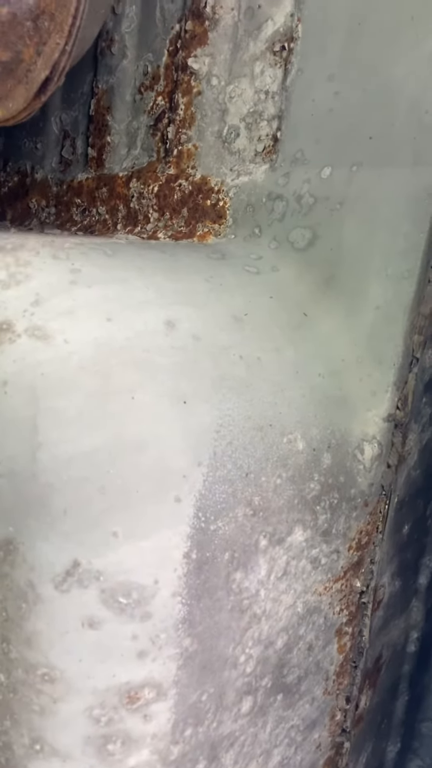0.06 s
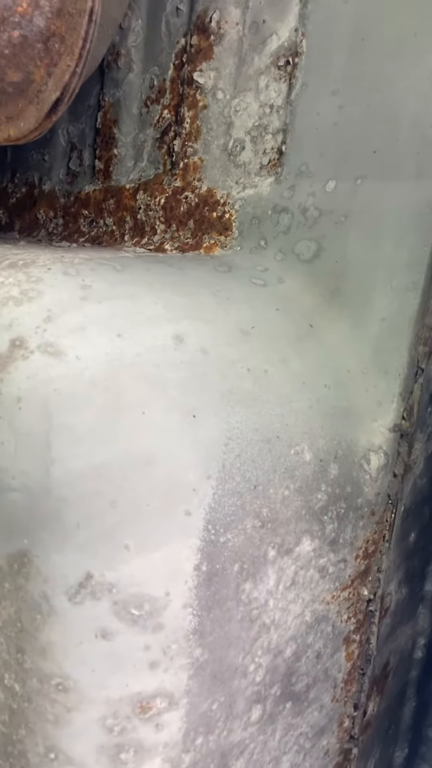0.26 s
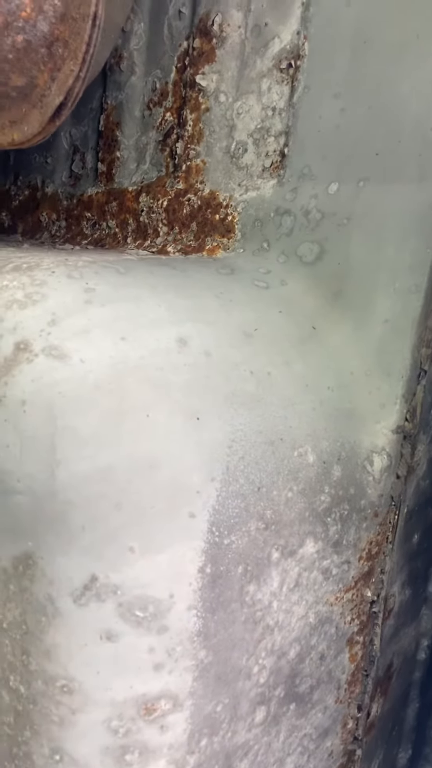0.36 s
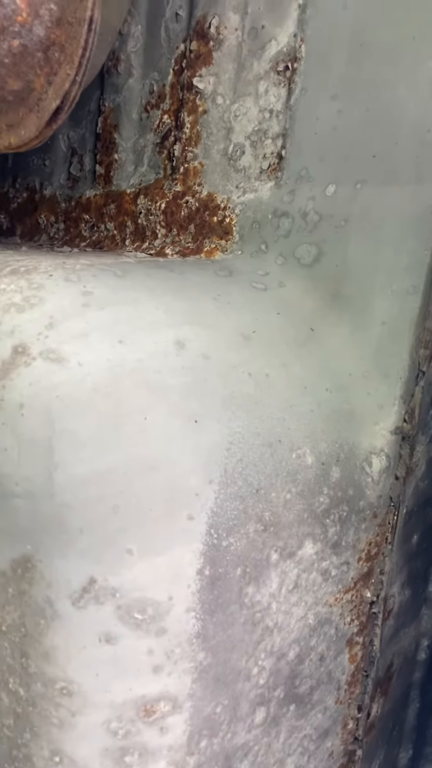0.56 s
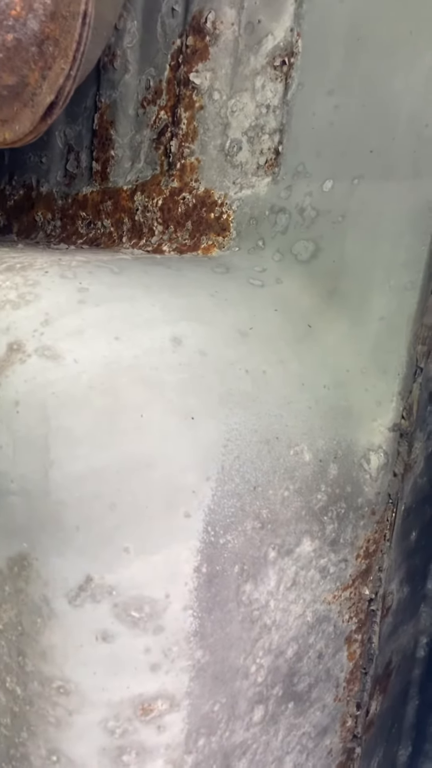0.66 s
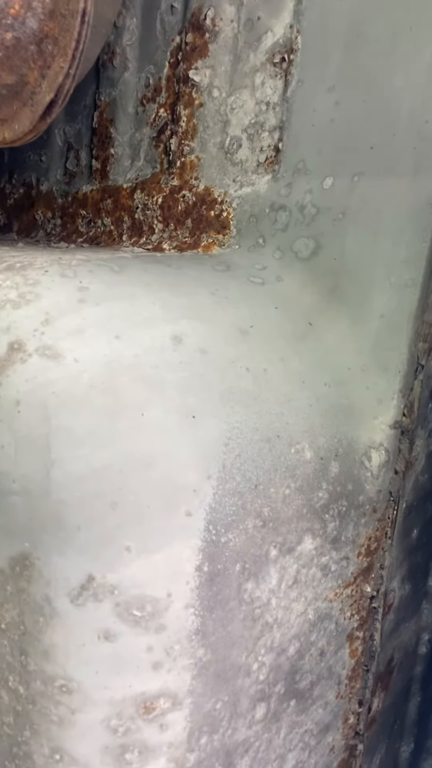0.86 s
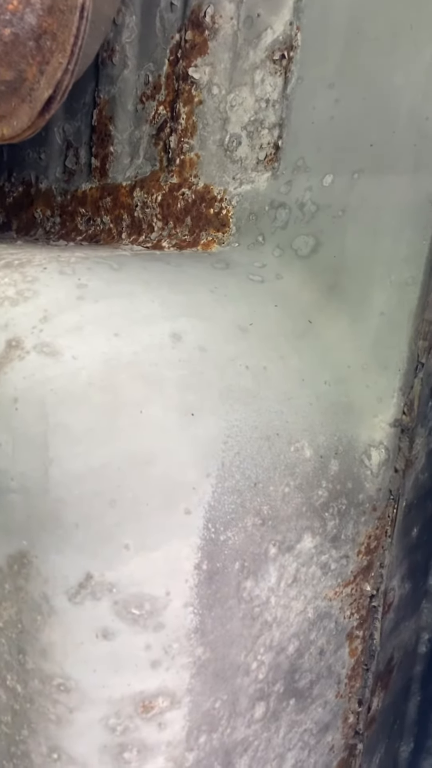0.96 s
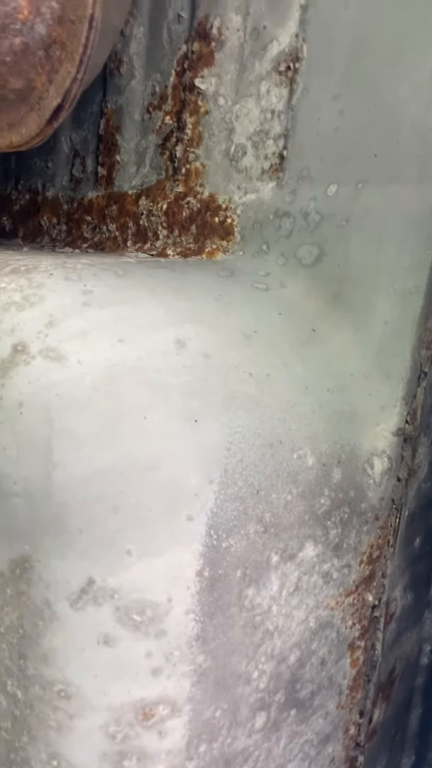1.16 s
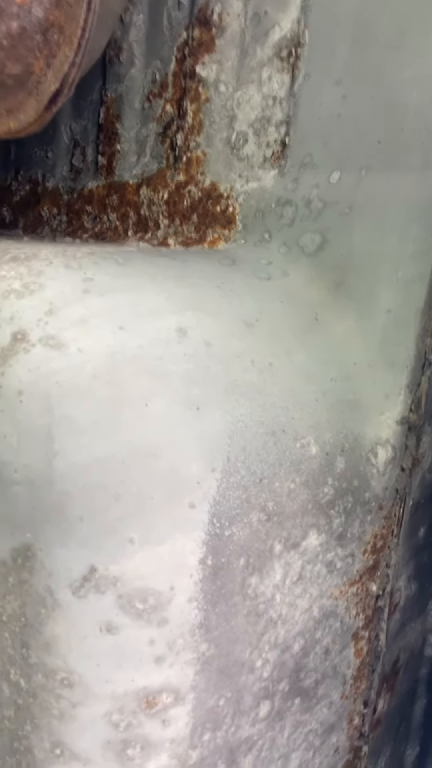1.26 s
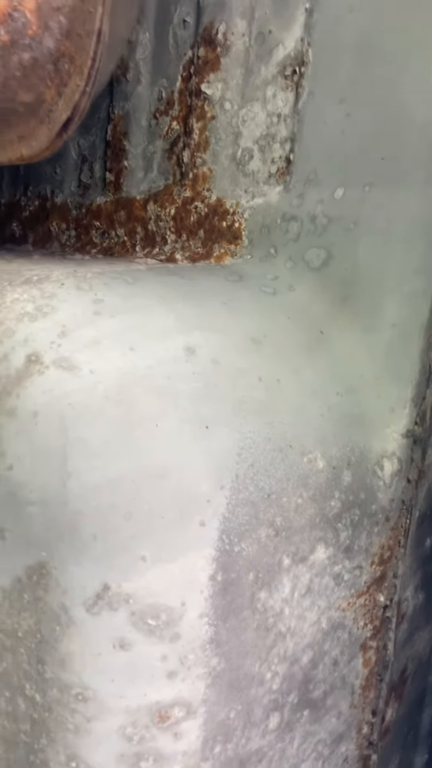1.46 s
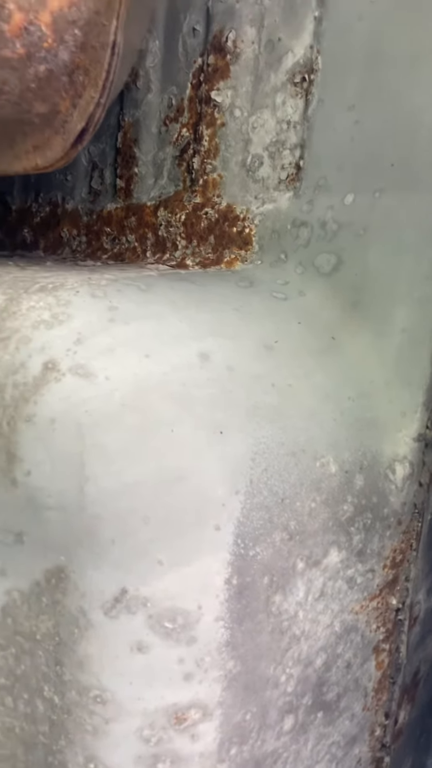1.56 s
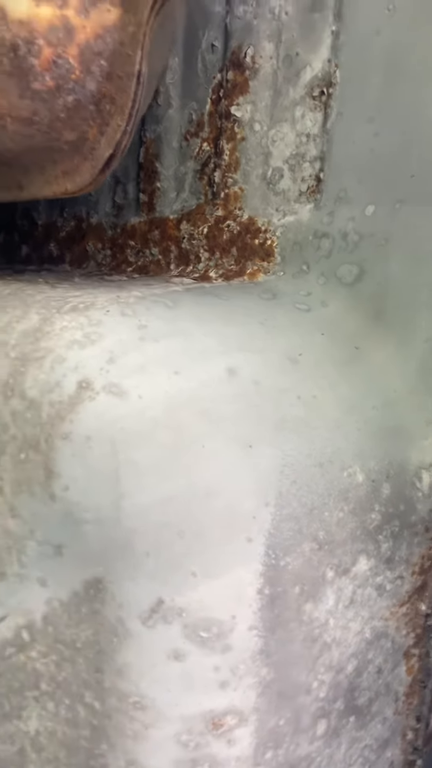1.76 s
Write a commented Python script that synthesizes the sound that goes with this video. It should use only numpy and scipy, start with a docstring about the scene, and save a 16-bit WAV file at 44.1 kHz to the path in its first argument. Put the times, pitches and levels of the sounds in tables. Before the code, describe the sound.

Wood knocks four times on a hollow steel tank, with small rebounds, over distant traffic rumble

```python
"""Under a car, a piece of wood knocks four times, with small rebounds, on a steel tank; a phone lies close by.
Each blow excites damped modes of the tank, treble first and bass late, and a brief noisy rattle of the sheet.
Faint bright ticks are short puffs of shaped noise. Behind lies distant traffic rumble, as fluctuating noise
bands, and a faint far bird, as gliding tones with diffuse echoes.
Two microphone ports hear it all with different phase, level and likeness."""
import sys
import numpy as np
from scipy import signal
from scipy.fft import rfft, irfft, next_fast_len
from scipy.io import wavfile
from scipy.ndimage import uniform_filter1d

SR = 44100
rng = np.random.default_rng(int(sys.argv[2]) if len(sys.argv) > 2 else 0)


def gain_from_decibels(decibels):
    """Convert decibel values to linear amplitude factors."""
    exponent = np.asarray(decibels, float) / 20
    return 10 ** exponent


def to_wav(s):
    """Save 16-bit WAV."""
    ch = np.atleast_2d(s).T  # columns
    pcm = np.round(np.clip(ch, -1, 1) * 32767)  # PCM
    wavfile.write(sys.argv[1], SR, pcm.astype(np.int16))


N = 81585  # length [samples]


def curve(table, hz, col=1):
    """Piecewise-linear interpolation of a table column on a log-frequency axis."""
    table = np.array(table, float)
    return np.interp(np.log(hz + 1), np.log(table[:, 0] + 1), table[:, col])


def band(size, hz, octaves):
    """Band-pass filtering: two independent noises in a bell-shaped band, rms near 1."""
    f = np.fft.rfftfreq(size, 1 / SR)
    bell = np.exp(-(np.log2((f + 1) / hz) / octaves) ** 2)
    noise = rng.standard_normal((2, size))
    return irfft(rfft(noise) * bell / np.sqrt(np.mean(bell ** 2)), size)


def walk(size, rate):
    """Slow random modulation: unit-variance levels held 1 / rate s, then smoothed twice."""
    hold = int(SR / rate)
    levels = np.repeat(rng.standard_normal(size // hold + 1), hold)
    return uniform_filter1d(uniform_filter1d(levels, hold), hold)[:size]


def shaped_noise(table, size):
    """Spectral shaping: two independent white noises filtered by a table of gains."""
    gain = gain_from_decibels(curve(table, np.fft.rfftfreq(size, 1 / SR)))
    return irfft(rfft(rng.standard_normal((2, size))) * gain, size)


# spectrum of traffic and air: (frequency [Hz], relative density [dB per Hz])
TOWN_SPECTRUM = [(20, -84), (33, 0), (55, -3.5), (120, -1), (180, -9.5), (300, -17), (500, -19.5),
                 (800, -27.5), (1050, -24), (1600, -30), (2100, -30), (2600, -33), (3000, -46.5),
                 (3800, -42.5), (4900, -49.5), (5600, -54), (6000, -48.5), (6600, -42), (7300, -55),
                 (8800, -50), (10000, -56.5), (11500, -64), (12800, -62), (14200, -65), (16500, -79)]
TOWN_DB = -33.5  # rms
SWELL_DB, FLICKER_DB = .7, 1.42  # scales of the common and the separate level walks


def town():
    """Band-noise synthesis: third-octave bands share a slow swell and flicker independently."""
    size = next_fast_len(N)
    out, swell = 0, walk(size, 1.9)
    for hz in 25 * 2 ** np.arange(0, 9.4, 1 / 3):
        db = SWELL_DB * swell + FLICKER_DB * walk(size, 11.76)
        # sqrt(hz) offsets the growing bandwidth
        out = out + gain_from_decibels(db) * np.sqrt(hz) * band(size, hz, 1 / 4)
    gain = gain_from_decibels(curve(TOWN_SPECTRUM, np.fft.rfftfreq(size, 1 / SR)))
    out = irfft(rfft(out) * gain, size)[:, :N]
    return out * gain_from_decibels(TOWN_DB) / np.sqrt(np.mean(out ** 2))


CRACK_S = 0.0023  # decay constant of the first contact
CRACK_LOW_HZ, CRACK_HIGH_HZ = 730, 5070  # the contact is strongest between these


def decay(t, hz, t60, ring, crack_db):
    """Damping: an exponential ring plus the fast-dying share of the first contact."""
    tail = np.exp(-np.log(1000) * t / (t60 * ring))
    share = 1 / (1 + (CRACK_LOW_HZ / hz) ** 2 + (hz / CRACK_HIGH_HZ) ** 2)
    return tail + gain_from_decibels(crack_db) * np.exp(-t / CRACK_S) * share


# tank modes before each blow's colour: (frequency [Hz], relative level [dB], t60 before the ring factor [s])
TANK_MODES = [(80, -2, 0.28), (97.1, -5, 0.34), (134.2, 2, 0.094), (169, -4.5, 0.14), (228, 0.5, 0.086),
              (347, 4.5, 0.046), (443, -3.5, 0.096), (586, -8, 0.14), (678, -10.5, 0.22),
              (1007, -3.5, 0.078), (1125, -8.5, .07), (1241, -10, 0.022), (1517, -24, 0.029),
              (1700, -15, 0.093), (1944, -8.5, 0.096), (2027, -10.5, 0.081), (2112, -24.5, 0.088),
              (2280, -17, 0.19), (3450, -15.5, 0.058), (3965, -17.5, 0.022)]
TANK_DB, MODE_SCATTER_DB = -5.5, 1  # common gain; random spread of each mode per blow
PUSH_S = .0003  # time constant of the onset


def tank_modes(t, ring, crack_db):
    """Modal superposition: damped sines, once in sine phase and once with random phases."""
    hz, db, t60 = np.array(TANK_MODES).T[:, :, None]
    scatter = MODE_SCATTER_DB * rng.standard_normal(hz.shape)
    onset = 1 - np.exp(-t / PUSH_S)
    gain = gain_from_decibels(TANK_DB + db + scatter) * decay(t, hz, t60, ring, crack_db) * onset
    turns = (0, rng.random(hz.shape))  # cycles
    return np.array([(gain * np.sin(2 * np.pi * (hz * t + turn))).sum(axis=0) for turn in turns])


# rattle of the sheet: (frequency [Hz], relative level [dB], t60 before the ring factor [s])
SHEET_RATTLE = [(197, -17, 0.26), (430, -13, 0.21), (820, -12.5, 0.11), (1020, -12, .13), (2020, -19, 0.15),
                (2750, -21, 0.097), (3550, -19.5, 0.086), (5100, -23, 0.078), (6600, -17, 0.066),
                (8800, -30.5, 0.043), (11400, -29, 0.081), (15600, -61, 0.039)]
RATTLE_DB, RATTLE_ROUGH_DB = -3.5, 2  # common gain; scale of the random level walk
RATTLE_RISE_S = 0.00043


def sheet_rattle(t, ring, crack_db):
    """Stochastic radiation: third-octave noise bands with rough levels, each with its own damping."""
    out, size = 0, len(t)
    onset = 1 - np.exp(-t / RATTLE_RISE_S)
    for hz in 200 * 2 ** np.arange(0, 6.4, 1 / 3):
        rough = gain_from_decibels(RATTLE_ROUGH_DB * walk(size, 250))
        fade = decay(t, hz, curve(SHEET_RATTLE, hz, col=2), ring, crack_db)
        level = gain_from_decibels(RATTLE_DB + curve(SHEET_RATTLE, hz))
        out = out + level * rough * band(size, hz, 0.24) * fade * onset
    return out


# where each colour gain acts; the struck spot sets the gains
BASS_HZ, BOOM_HZ, BODY_HZ, TREBLE_HZ = 162, 231, 574, 3130


def colour(f, bass_db, boom_db, body_db, treble_db):
    """Selective excitation: shelves and bells weight the spectrum; the low end falls off steeply."""
    shelves = bass_db / (1 + (f / BASS_HZ) ** 4) + treble_db / (1 + (TREBLE_HZ / f) ** 4)
    bell = lambda hz: np.exp(-(2 * np.log2(f / hz)) ** 2)
    bells = boom_db * bell(BOOM_HZ) + body_db * bell(BODY_HZ)
    return gain_from_decibels(shelves + bells) / (1 + (67 / f) ** 6)  # little sounds below 67 Hz


LAG_AT_100HZ_S, LAG_SLOPE = .0115, 1.1  # delay and its inverse power of frequency


def dispersion(f, size):
    """Dispersion of bending waves: group delay grows toward the bass, which arrives late."""
    lag = LAG_AT_100HZ_S * (100 / np.maximum(f, 45)) ** LAG_SLOPE
    return np.exp(-2j * np.pi * np.cumsum(lag) * SR / size)  # phase is the integral of delay


def knock(bass_db, boom_db, body_db, treble_db, ring, crack_db, size=16384):
    """Impact response of one blow: a direct row and a scattered row with other phases."""
    t, f = np.arange(size) / SR, np.fft.rfftfreq(size, 1 / SR) + 1
    sound = tank_modes(t, ring, crack_db) + sheet_rattle(t, ring, crack_db)
    tone = colour(f, bass_db, boom_db, body_db, treble_db)
    return irfft(rfft(sound) * tone * dispersion(f, size), size)


# blows and rebounds: (time [s], gain [dB], bass [dB], boom [dB], body [dB], treble [dB],
# ring length [factor], crack relative to ring [dB])
BLOWS = [(0.2006, -4.5, 1.7, 6, 2.1, 0.5, 0.9, 5), (0.295, -32.5, 14, 2, -2, 1, 0.54, 8),
         (0.7086, -11, 1, 1.8, -2.5, -2, 0.87, -0.5), (1.1002, -6.5, 3.5, 0.5, 3.2, 7, 0.82, 7.9),
         (1.159, -12.5, -5.5, -8.5, -9, -11, 1.04, 12.5), (1.186, -31.5, -20, -13, -9, -19, 0.57, 18.5),
         (1.464, -6, 0.9, -2, 1.5, 7.5, 0.8, 1.5), (1.523, -21, -12, 1, -5, -33, 0.84, 9.5),
         (1.538, -15.5, -35, -13, -14, -10, 1.01, 7.5), (1.567, -26, -26, -1, -12, -26, 0.47, 13.5)]


def tank():
    """Linear superposition: all blows in place, each with a short tapered lead-in."""
    lead, out = 1024, np.zeros((2, N + 16384))
    for time, db, *settings in BLOWS:
        hit = np.roll(gain_from_decibels(db) * knock(*settings), lead, axis=1)
        start = int(time * SR) - lead
        size = hit.shape[1]
        out[:, start:start + size] += hit * signal.windows.tukey(size, .1)
    return out[:, :N]


# bright faint ticks, perhaps rust or grit shaken loose: (start [s], envelope peak [dB], rise and decay constant [s])
TICK_TIMES = [(.221, -50, .003), (.238, -44, 0.0028), (0.244, -48, 0.0021), (0.2934, -35.5, 0.0017),
              (1.626, -56, 0.0022)]
# spectrum of the ticks: (frequency [Hz], gain [dB])
TICK_SPECTRUM = [(1500, -12), (3800, 9), (5000, 5), (6800, 5.5), (10000, -2.5), (13000, -9), (16000, -10)]


def ticks():
    """Envelope modulation: short critically damped puffs of bright noise."""
    t, env = np.arange(N) / SR, 0
    for start, db, constant in TICK_TIMES:
        u = np.maximum(t - start, 0) / constant
        env = env + gain_from_decibels(db) * np.e * u * np.exp(-u)
    return env * shaped_noise(TICK_SPECTRUM, next_fast_len(N))[:, :N]


# far bird notes: (start [s], length [s], from [Hz], to [Hz], level before breaks and echo [dB])
BIRD_NOTES = [(0.535, 0.05, 4306, 4130, -55), (.555, 0.026, 3750, 3520, -63),
              (.565, 0.056, 3240, 3260, -56.5), (.612, 0.034, 3543, 3564, -54),
              (.615, 0.057, 3250, 3190, -58), (1.498, 0.045, 4200, 4110, -58.5),
              (1.565, 0.042, 3510, 3430, -55.5), (1.623, 0.0106, 3800, 3730, -56),
              (1.718, .03, 3500, 3450, -66)]
BIRD_WAVER_HZ, BIRD_BREAK_DB = 170, 3.5  # scales of the random pitch and level walks
BIRD_T60_S, BIRD_WET_DB = 0.18, 3.5  # echo decay; echo energy against direct


def bird():
    """Frequency modulation and diffuse reverberation: gliding, wavering, broken whistles with echoes."""
    t, song = np.arange(N) / SR, 0
    for start, length, from_hz, to_hz, db in BIRD_NOTES:
        u = np.clip((t - start) / length, 0, 1)
        hz = from_hz + (to_hz - from_hz) * u + BIRD_WAVER_HZ * walk(N, 450)
        arch = np.sqrt(np.sin(np.pi * u) + 1e-12)
        loud = gain_from_decibels(db + BIRD_BREAK_DB * walk(N, 150)) * arch
        song = song + loud * np.sin(2 * np.pi * np.cumsum(hz) / SR)
    echo = rng.standard_normal((2, 8192)) * np.exp(-np.log(1000) * t[:8192] / BIRD_T60_S)
    echo *= gain_from_decibels(BIRD_WET_DB) / np.sqrt((echo ** 2).sum(axis=1, keepdims=True))
    return song + signal.fftconvolve(song[None], echo, axes=1)[:, :N]


def scene():
    """Superposition of sources: row 0 is direct sound, row 1 scattered sound."""
    return town() + tank() + ticks() + bird()


# phase lead of the left port over the right: (frequency [Hz], phase [rad])
LEFT_PHASE = [(20, 0), (130, .2), (250, 1.1), (730, 1.9), (1050, 1.0), (1720, -.4), (2100, -.9), (2450, -3),
              (3450, -5.9), (4100, -6.7), (4550, -9), (5200, -9.5), (6900, -10.4), (8600, -11.8),
              (10500, -12.5), (12700, -13.7), (13400, -15.3)]
# level of the left port against the right: (frequency [Hz], level [dB])
LEFT_LEVEL = [(60, -3.5), (110, -5.0), (200, -8.5), (380, -5.0), (700, -1.0), (1290, 1.5), (2380, 1.5),
              (4400, 0.0), (8120, -0.5), (15000, 0.0)]
# likeness of the two ports: (frequency [Hz], coherence [0-1])
LIKENESS = [(60, .995), (200, .95), (320, .85), (1200, .85), (2200, .9), (4100, .75), (5200, .96),
            (6900, .97), (8000, .75), (9300, .97), (10300, .995), (11700, .99), (13000, .6), (14300, .85)]


def ports(dry):
    """Partial coherence: right is direct sound; left a phase-shifted share of it plus scattered sound."""
    pad = 1024
    size = next_fast_len(N + 2 * pad)
    f = np.fft.rfftfreq(size, 1 / SR)
    padded = np.pad(dry, ((0, 0), (pad, pad)), mode="reflect", reflect_type="odd")
    direct, scattered = rfft(padded, size)
    alike = np.clip(curve(LIKENESS, f), 0, 1)
    shared = alike * np.exp(1j * curve(LEFT_PHASE, f)) * direct
    left = gain_from_decibels(curve(LEFT_LEVEL, f)) * (shared + np.sqrt(1 - alike ** 2) * scattered)
    return irfft(np.array([left, direct]), size)[:, pad:pad + N]


def top_cut(x):
    """Nothing passes above the cut-off."""
    return signal.sosfilt(signal.butter(12, 16470, fs=SR, output="sos"), x)


def record(dry):
    """Saturation: both port signals round off smoothly toward a ceiling."""
    ceiling = .97  # of full scale
    mix = ceiling * np.tanh(ports(dry) / ceiling)
    return top_cut(mix)


dry = scene()
out = record(dry)
to_wav(out)
```